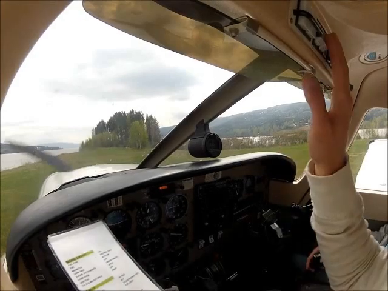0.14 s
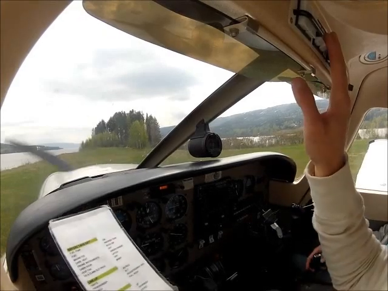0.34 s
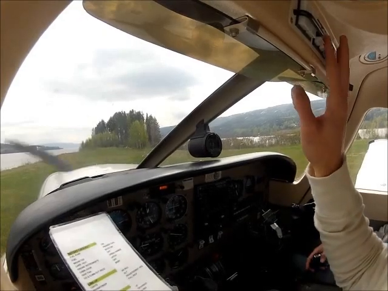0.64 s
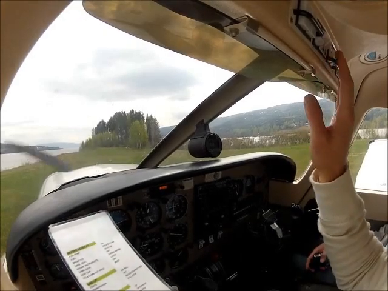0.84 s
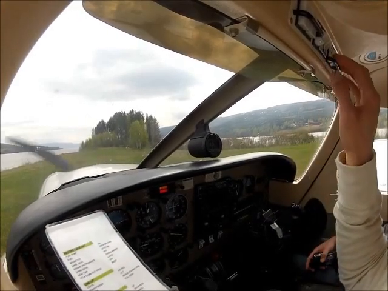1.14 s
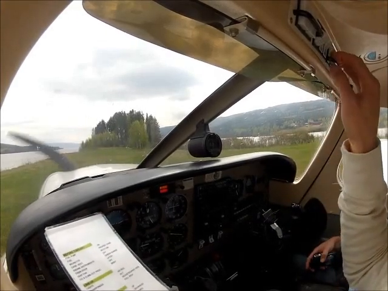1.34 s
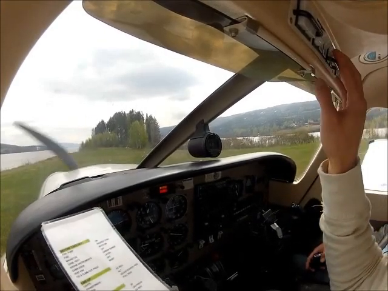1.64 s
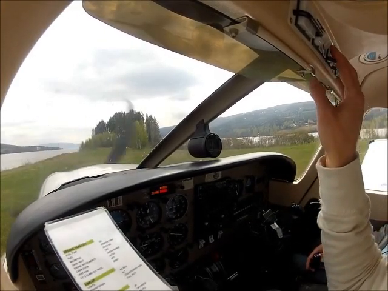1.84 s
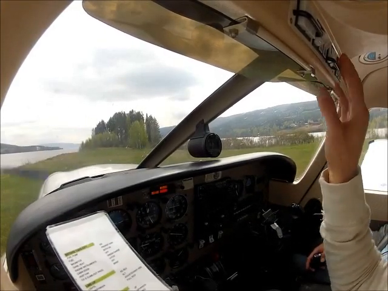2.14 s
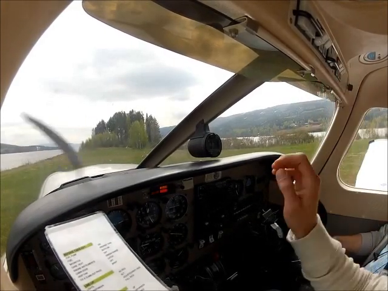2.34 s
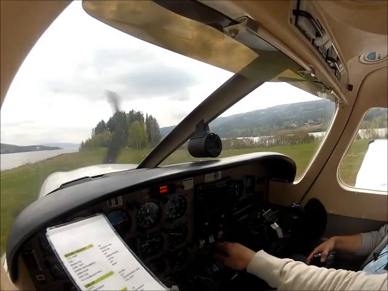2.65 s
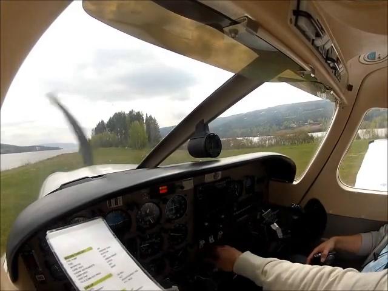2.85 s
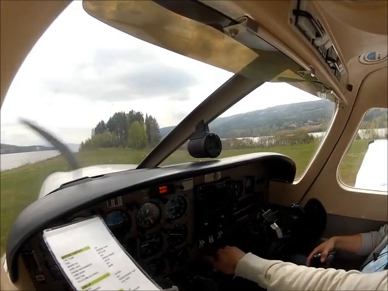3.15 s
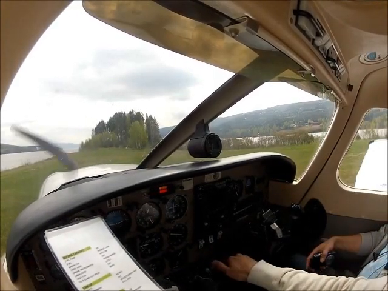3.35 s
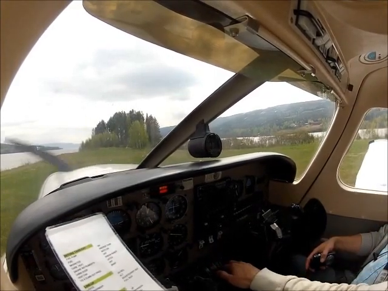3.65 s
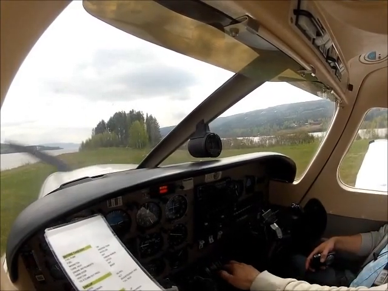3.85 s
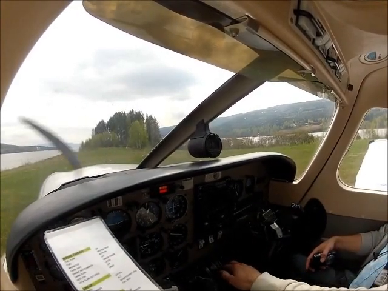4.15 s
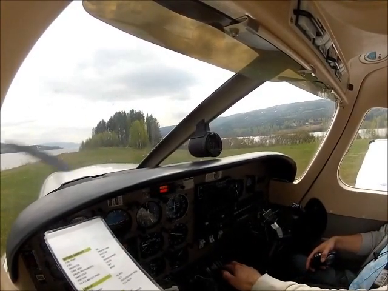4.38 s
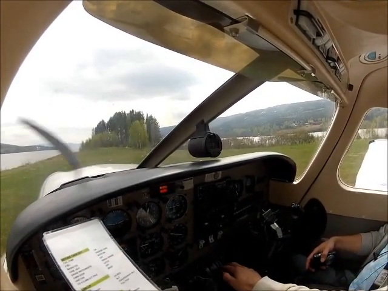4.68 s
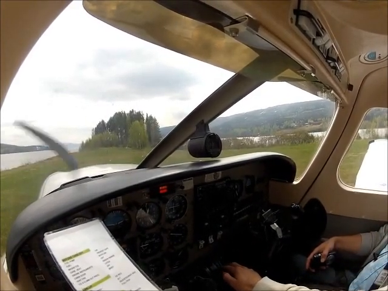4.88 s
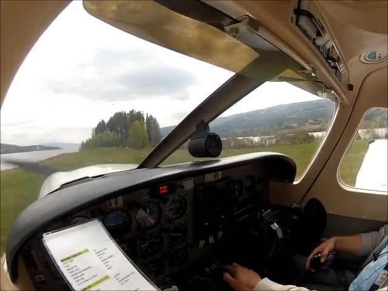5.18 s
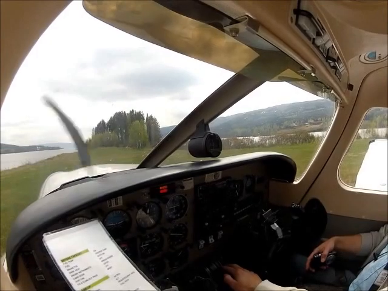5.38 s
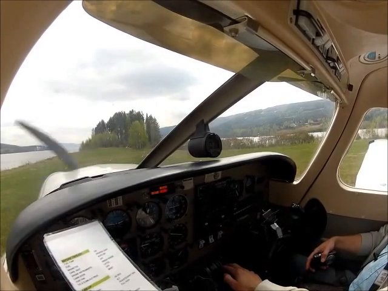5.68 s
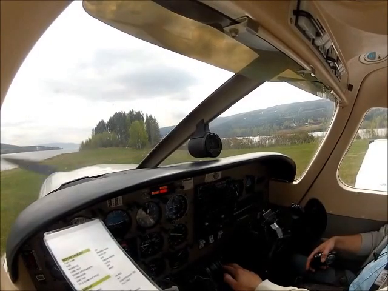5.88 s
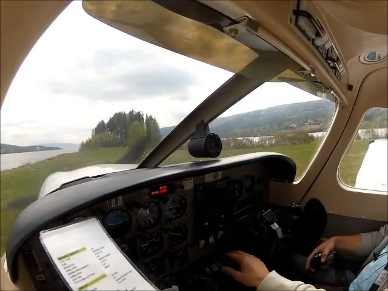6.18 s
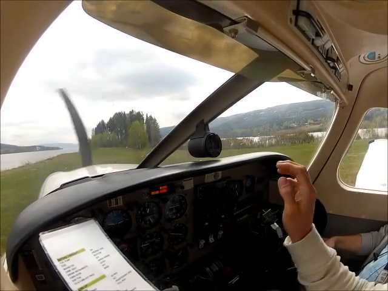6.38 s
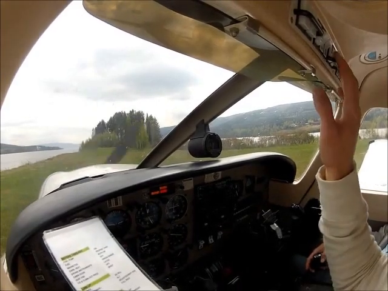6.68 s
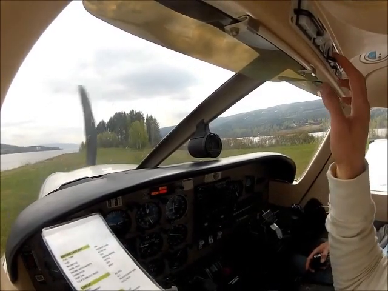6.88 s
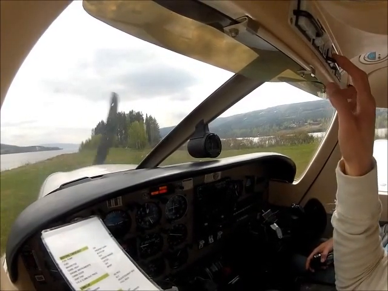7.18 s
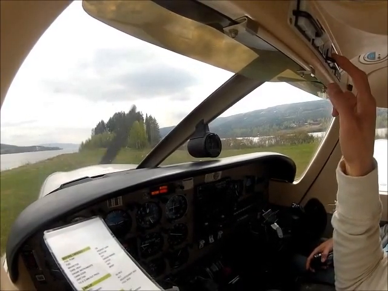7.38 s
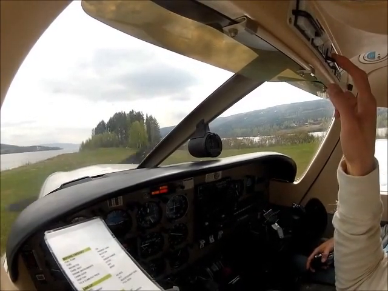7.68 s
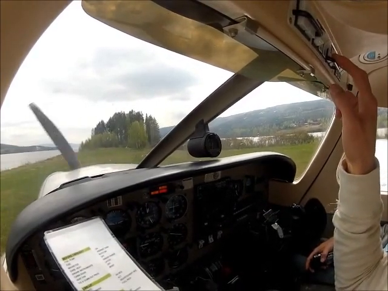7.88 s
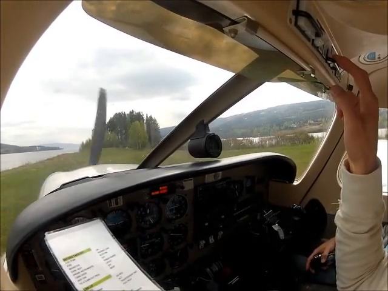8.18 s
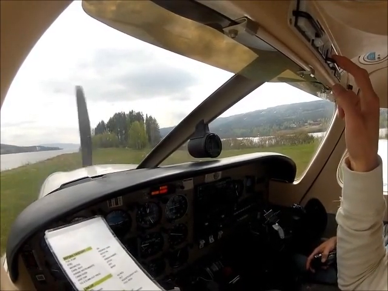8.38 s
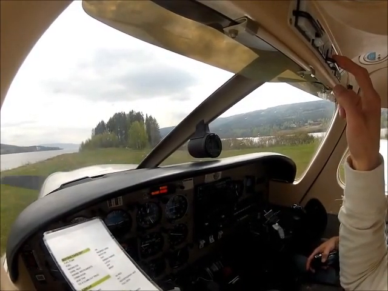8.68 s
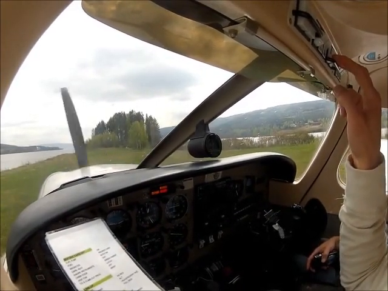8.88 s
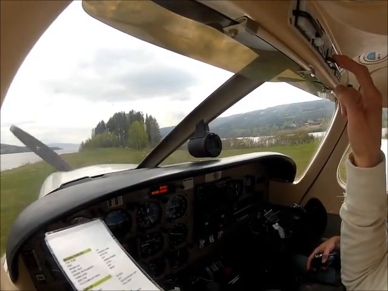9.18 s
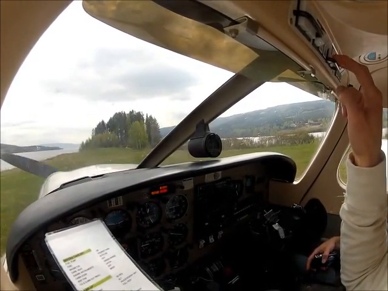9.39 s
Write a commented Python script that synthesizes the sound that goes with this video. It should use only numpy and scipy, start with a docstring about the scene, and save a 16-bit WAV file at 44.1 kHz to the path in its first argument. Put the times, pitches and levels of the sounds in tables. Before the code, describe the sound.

A close, boxy cabin sound on a coarse little camera microphone: low engine drone, rumble and airy hiss. Roof switches click sharply, ignition cuts for a moment, and the exhaust thumps violently, momentarily ducking the sound. The drone returns, with tiny metal chirps, before running down. Dull knocks and rattling ticks alternate ever slower, cowling buzzing, then stop under a faint high whine.

```python
"""In an aircraft cockpit, on a small camera's microphone, a piston engine idles: multiples of its throb and noise
swelling with each firing, under a thin gyro whine. Roof switches snap as short noise bursts; the ignition is cut for
a moment and the exhaust thumps, as decaying tones, as it catches again. Small metal parts chirp. Then the fuel is
cut and the engine runs down; once it is slow, ringing noise makes the paired clacks of the magneto couplings, a
panel slaps and the cowling buzzes, until the propeller rests. The camera samples coarsely and ducks after overload."""
import sys
import numpy as np
from scipy import signal
from scipy.fft import rfft, irfft, next_fast_len
from scipy.io import wavfile
from scipy.ndimage import uniform_filter1d, minimum_filter1d

SR = 44100
rng = np.random.default_rng(int(sys.argv[2]) if len(sys.argv) > 2 else 0)


def log_audio(samples):
    """Write samples as a 16-bit WAV file to the path given in sys.argv[1]."""
    # one column per channel
    frames = np.atleast_2d(samples).T
    # limit to full scale, then quantise
    limited = np.clip(frames, -1, 1)
    pcm = np.round(limited * 32767).astype(np.int16)
    wavfile.write(sys.argv[1], SR, pcm)


N = 420252

# gyro instruments spinning on: time_s, whine_hz, level_db
GYRO_WHINE = [(0, 778, -44.5), (3.5, 775.5, -39), (6, 778.3, -44), (7.4, 771, -42), (9.53, 752, -42)]
# faint chirps of small metal parts: start_s, peak_db, pitch_hz
CHIRPS = [(3.24, -43.5, 4000), (3.28, -43, 4010), (3.388, -45.5, 4100), (3.425, -45, 4070),
          (3.482, -39, 4020), (3.52, -43.5, 4030), (6.503, -41, 2600), (6.524, -40, 2430),
          (6.589, -41, 2970), (6.611, -39, 2830), (6.632, -43, 2650), (7.162, -43, 3200),
          (7.185, -39, 2880), (7.215, -41, 3640), (7.238, -39, 3660), (7.294, -37, 3620), (7.31, -42, 3640),
          (7.395, -49, 2960)]
# roof switches and levers: start_s, peak_db, ping_db (against the peak)
SWITCHES = [(0.7975, -20, -9), (1.398, -34, -18), (1.4177, -37, -19), (1.4617, -11.5, -18),
            (1.47, -18, 1.5), (1.9827, -13, 0.5), (3.1273, -32.5, -26), (6.31, -44, -20), (6.813, -37, -25),
            (6.9227, -46, -20), (7.025, -39.5, -22), (7.07, -47, -23), (7.362, -39, -17),
            (7.417, -37.5, -18)]
# spectrum of a switch snap: frequency_hz, density_db (per Hz, relative)
SWITCH_SPECTRUM = [(410, -12), (700, -8), (808, -11), (1170, -18), (1450, -6), (1970, -16.5), (2850, -3),
                   (3760, -9), (4190, -5.5), (6000, -24.5), (7800, -77), (13200, -120)]
# resonances of the switch ping: frequency_hz, width_hz, level_db (relative)
PING_MODES = [(4100, 350, 0), (5200, 1300, -5)]
SNAP_DECAY_S = .0055
# the slowing engine rocks on its mounts: time_s, rocking_db
ROCKING = [(7.45, -29), (7.6, -6.5), (7.9, -2.5), (8.12, -0.5), (8.33, -3.5), (8.5, -11), (9, -12),
           (9.45, -9)]
# airframe boom under the cowling buzz: frequency_hz, width_hz, level_db (against the rocking)
SWAY_MODES = [(94, 25, -18)]
COWLING_DB = -47.5   # buzz against the rocking
SWAY_FOLLOWS = 1.7   # dB of boom per dB of rocking: it swells more steeply than the buzz
# a loose panel slapping while the engine rocks: start_s, level_db (relative)
SLAPS = [(7.6374, -34), (7.7068, -31), (7.7844, -31), (8.0093, -17), (8.044, -24), (8.085, -23),
         (8.1294, -31), (8.1683, -24.5), (8.2613, -23.5)]
# unburnt fuel going off in the exhaust: start_s, peak_db, pitch_hz, t60_s
THUMPS = [(1.989, -0.5, 350, 0.23), (1.6, -8.5, 120, 0.33), (1.9898, -6, 320, 0.16), (2.0074, 9, 262, 0.06),
          (2.0104, 12, 590, 0.027)]
# first magneto coupling, dull: release_s, knock_db (relative)
CLACKS = [(7.501, -2), (7.558, -11.5), (7.625, -9), (7.695, -9), (7.768, -9.5), (7.843, -9), (7.914, -8),
          (7.995, -7), (8.074, -7), (8.159, -7.5), (8.244, -6), (8.34, -7), (8.443, -7.5), (8.551, -7.5),
          (8.664, -7.5), (8.784, -8), (8.913, -8), (9.05, -8.5), (9.2, -8), (9.374, -10.5)]
# second coupling, rattling: release_s, knock_db (relative)
RATTLES = [(7.529, -15.5), (7.591, -10.5), (7.659, -11.5), (7.73, -12), (7.803, -11), (7.877, -9),
           (7.954, -8), (8.034, -9), (8.115, -6.5), (8.201, -10), (8.295, -10.5), (8.399, -7.5),
           (8.508, -9), (8.617, -11.5), (8.737, -7.5), (8.865, -9), (9.001, -9), (9.15, -9.5), (9.314, -10),
           (9.519, -24.5)]
# contacts within one release of the first coupling: lag_s, level_db (against the knock)
CLACK_CONTACTS = [(-.0055, -16.5), (-.0028, -5), (-.0002, 3.5), (.0075, -6), (.015, -12)]
# contacts within one release of the second coupling: lag_s, level_db (against the knock)
RATTLE_CONTACTS = [(-.0022, 1), (.002, -8.5), (.006, -6.5), (.011, -8)]
# resonances of the knock through the firewall: frequency_hz, width_hz, level_db (relative)
KNOCK_MODES = [(479, 91, -1.5), (594, 53, 1.5), (691, 33, 4), (842, 67, -0.5)]
# resonances of the ticking metal: frequency_hz, width_hz, level_db (relative)
METAL_MODES = [(1116, 104, -4), (1560, 143, -2.5), (1970, 290, -1), (2340, 450, -3), (2640, 207, 6),
               (3047, 115, 1.0), (3260, 550, -8.5), (3940, 120, -6), (4190, 87, -5.5), (5180, 440, -20.5)]
# resonances of the airframe when shoved: frequency_hz, width_hz, level_db (relative)
SHOVE_MODES = [(34.6, 29, -0.5), (98, 43.5, 2.5), (210, 128, -9)]
# tick against the knock: (dB early, dB late); the clack's stays level, the rattle's steps up after CATCH_S
CLACK_TICK_DB, RATTLE_TICK_DB, CATCH_S = (-2.5, -2.5), (-3, 1), 8.23
# engine speed: time_s, throb_hz
SPEED = [(0.0, 39.6), (1.5, 40.3), (1.63, 38.3), (1.83, 33.3), (1.95, 32.6), (2.37, 36.3), (2.62, 37.9),
         (3.09, 39.3), (3.8, 39.9), (4.45, 41.1), (5.0, 39.9), (5.4, 38.6), (5.63, 33.9), (6.26, 25.6),
         (6.59, 22.0), (6.9, 19.3), (7.4, 15.7), (8.0, 12.7), (8.7, 8.6), (9.53, 5.0)]
# combustion against steady idle, the throb lagging behind: time_s, firing_db, throb_db
BURN = [(0, -0.5, 1.5), (1.45, 1, 0.5), (1.65, -4.5, 2.5), (1.85, -22, -30), (1.98, -25, -33),
        (2.25, -3.5, -19), (2.6, -3.5, -4), (3.0, -2, -4.5), (3.4, -0.5, 1), (4.5, 1.5, -1.5), (5.3, -2, 1),
        (5.5, -7, -3), (5.7, -21, -34), (6.2, -50, -50)]
# multiples of the throb: multiple, fired_db (from firing), pumped_db (from pistons pumping air)
ORDERS = [(1., -11, -23.5), (2., -14.5, -19.5), (3., -19.5, -32), (4., -26.5, -32.5), (5., -34.5, -38.5),
          (6., -38.5, -40), (7., -42.5, -44.5), (8., -40, -46), (10., -49, -41), (.5, -26, -42),
          (1.5, -28, -47.5), (2.5, -25.5, -41), (3.5, -39, -47), (4.5, -41, -44), (.75, -49, -50),
          (1.25, -38, -49), (1.75, -39, -48), (2.25, -35.5, -47)]
# how the cabin answers a low tone: frequency_hz, gain_db
CABIN_RESPONSE = [(12, -9), (19, -8), (24, -4), (27, 4.5), (33, -3), (40, -1.5), (50, 2), (57, 6.5),
                  (66, -4), (80, 0.5), (98, 3), (106, 3.5), (116, -7.5), (122, 2), (135, 1.5), (160, 0.5),
                  (176, -0.5), (188, 8.5), (200, 0)]
# strength of the four firings in one lope: strength_db
CYLINDERS_DB = [-2, -11, -4, -6.5]
# airframe noises, in rows rumble, drumming, hiss: fired_db (from firing), turning_db (from turning at idle),
# loss_db (per halving of speed), rocked_db (from rocking)
AIRFRAME = [(-21.5, -24.5, 1.5, -19.5), (-23, -25, 5, -22.5), (-44, -46, 3, -48)]
# spectrum of the lowest airframe noise: frequency_hz, density_db (per Hz, relative)
RUMBLE_SPECTRUM = [(15, -20), (25, -8), (45, -1.5), (70, -8), (100, 1.5), (140, -6), (190, -4),
                   (230, -10.5), (330, -25.5), (500, -60)]
# spectrum of the middle airframe noise: frequency_hz, density_db (per Hz, relative)
DRUMMING_SPECTRUM = [(150, -30), (250, -3), (388, -2), (491, -3.5), (553, -9), (674, -7.5), (731, -10.5),
                     (797, -7), (948, -22), (1100, -25.5), (1430, -57), (2420, -120)]
# spectrum of the highest airframe noise: frequency_hz, density_db (per Hz, relative)
HISS_SPECTRUM = [(530, -36), (900, -14), (1170, -6), (1270, -13.5), (1680, -10.5), (1770, -16), (2910, -12),
                 (3330, -15.5), (4070, -18), (4300, -20.5), (6000, -33), (7800, -74), (13200, -120)]
IDLE_HZ = 40   # throb rate at idle
GEAR_MULTIPLE, GEAR_DB = 20.3, -36.5   # accessory gear whine: multiple of the throb, dB at idle
STOP_S, STOP_DB_S = 9.334, 65   # the propeller comes to rest: time, then fall in dB per second
DUCK_FROM_DB, DUCK_HOLD_S, DUCK_RELEASE_DB_S, DUCK_ATTACK_S = 1.5, 0.13, 96, 0.0022
HOLD_HZ, CUTOFF_HZ = 12000, 15950   # the camera's coarse sampling rate and its top cut


def from_db(db):
    """Gain of a level in dB."""
    return 10 ** (np.asarray(db) / 20)


def rms_one(x):
    """Scaled to rms 1."""
    return x / np.sqrt(np.mean(x ** 2) + 1e-20)


def in_time(curve):
    """Columns of a curve table, interpolated to one value a sample."""
    time_s, *columns = np.transpose(curve)
    return [np.interp(np.arange(N) / SR, time_s, column) for column in columns]


def drift(rate_hz):
    """Slow random wander of rms 1: noise through two equal low-pass poles, run at every 40th sample."""
    r = np.exp(-2 * np.pi * rate_hz * 40 / SR)
    noise = rng.standard_normal(N // 40 + 2002)
    slow = signal.lfilter([1], [1, -2 * r, r * r], noise)[2000:]   # settled part only
    return np.interp(np.arange(N) / 40, np.arange(len(slow)), rms_one(slow))


def coloured(spectrum):
    """Noise of rms 1 with the given spectrum, interpolated over log frequency."""
    hz, density_db = np.transpose(spectrum)
    size = next_fast_len(N)
    log_hz = np.log(np.arange(size // 2 + 1) * SR / size + 1)
    gain = from_db(np.interp(log_hz, np.log(hz), density_db, left=-99, right=-99))
    return rms_one(irfft(rfft(rng.standard_normal(size)) * gain, size)[:N])


def resonate(x, modes):
    """Parallel two-pole resonances, signs alternating."""
    out = 0
    for k, (hz, width_hz, level_db) in enumerate(modes):
        r = np.exp(-np.pi * width_hz / SR)
        poles = [1, -2 * r * np.cos(2 * np.pi * hz / SR), r * r]
        zeros = np.array([1, 0, -1]) * (1 - r * r) / 2
        out = out + (-1) ** k * from_db(level_db) * signal.lfilter(zeros, poles, x)
    return out


def bursts(starts_s, levels_db, decays_s, rise_s):
    """Envelope of short rattles: a quick rise, then an exponential fall."""
    out, t = np.zeros(N + 4000) + 1e-9, np.arange(4000) / SR
    for start_s, level_db, decay_s in zip(starts_s, levels_db, decays_s):
        shape = (1 - np.exp(-t / rise_s)) * np.exp(-t / max(decay_s, .001))
        out[round(start_s * SR):][:4000] += from_db(level_db) * shape
    return out[:N]


def metal(envelope):
    """Noise under the envelope, ringing in the metal and dulled by the firewall."""
    ringing = resonate(envelope * rng.standard_normal(N), METAL_MODES)
    return signal.sosfilt(signal.butter(3, 4600, fs=SR, output="sos"), ringing)


def rocking_db():
    """Level of the engine's rocking on its mounts, silent before it starts."""
    return np.where(np.arange(N) < ROCKING[0][0] * SR, -99, in_time(ROCKING)[0])


def gyros():
    """Spinning instruments: a thin sine whine, slightly unsteady in pitch and level."""
    whine_hz, level_db = in_time(GYRO_WHINE)
    cycles = np.cumsum(whine_hz + 1.53 * drift(3.19)) / SR
    return np.sqrt(2) * from_db(level_db + 1.3 * drift(12.0)) * np.sin(2 * np.pi * cycles)


def chirps():
    """Small metal parts: narrow noise in a short, soft-edged swell."""
    out, t = np.zeros(N), np.arange(1000) / SR
    swell = t / 0.0045 * np.exp(1 - t / 0.0045)   # reaches 1 after 4.5 ms
    for start_s, peak_db, hz in CHIRPS:
        mode = [(hz, 250, 0)]
        rub = rms_one(resonate(resonate(rng.standard_normal(1000), mode), mode))
        out[round(start_s * SR):][:1000] += from_db(peak_db - 6) * rub * swell   # noise peaks above its rms
    return out


def switches():
    """Roof switches: bright noise snaps with a short ring in the cabin, each with a resonant ping."""
    start_s, peak_db, ping_db = np.transpose(SWITCHES)
    decay_s = 0 * start_s + SNAP_DECAY_S
    snap = bursts(start_s - .001, peak_db, decay_s, rise_s=0.0012)
    cabin_ring = bursts(start_s, peak_db - 16, 3.4 * decay_s, rise_s=0.0022)
    ping = rms_one(resonate(rng.standard_normal(N), PING_MODES))
    ping_envelope = bursts(start_s, peak_db + ping_db, decay_s, rise_s=0.00023)
    return (snap + cabin_ring) * coloured(SWITCH_SPECTRUM) + ping * ping_envelope


def cowling():
    """The rocking engine shakes the cowling: dense uneven grains ring in the metal, over an airframe boom."""
    uneven = from_db(3.2 * np.minimum(rng.exponential(1, N), 4))
    grains = (rng.random(N) < 1500 / SR) * uneven   # about 1500 a second
    buzz = from_db(COWLING_DB + 4.4 * drift(25.0)) * rms_one(metal(grains))
    sway = rms_one(resonate(resonate(rng.standard_normal(N), SWAY_MODES), SWAY_MODES))
    boom = from_db(SWAY_MODES[0][2] + (SWAY_FOLLOWS - 1) * rocking_db()) * sway
    return from_db(rocking_db()) * (buzz + boom)


def panel_slaps():
    """A loose panel slaps while the engine rocks: noise bursts ringing in metal."""
    start_s, level_db = np.transpose(SLAPS)
    return metal(bursts(start_s - .001, level_db + 14.5, 0 * start_s + 0.0057, rise_s=0.0012))


def exhaust():
    """Unburnt fuel goes off: dull blows ring in the pipe as decaying sines."""
    out, t = np.zeros(N), np.arange(N) / SR
    for start_s, peak_db, hz, t60_s in THUMPS:
        age_s = np.maximum(t - start_s, 0)
        out += from_db(peak_db - 60 * age_s / t60_s) * np.sin(2 * np.pi * hz * age_s)
    return out


def coupling(releases, contacts, ticks_db, tick_decay_s):
    """Every spring release repeats the same contacts: a knock through the firewall, a metal tick, a shove."""
    release_s, knock_db = np.transpose(releases)
    early_db, late_db = ticks_db
    tick_db = knock_db + np.where(release_s > CATCH_S, late_db, early_db)
    blows, chance = np.zeros(N + SR), rng.standard_normal((len(release_s), len(contacts)))
    for k, (lag_s, level_db) in enumerate(contacts):
        at = np.round((release_s + lag_s) * SR).astype(int)
        blows[at] += from_db(knock_db + level_db + 1.3 * chance[:, k])
    firewall = signal.butter(4, [410, 900], "band", fs=SR, output="sos")
    knock = from_db(35.5) * signal.sosfilt(firewall, resonate(blows[:N] + 1e-18, KNOCK_MODES))
    tick = bursts(release_s - .002, tick_db, 0 * release_s + tick_decay_s, rise_s=0.0014)
    tail = bursts(release_s, tick_db - 27.0, 0 * release_s + 0.015, rise_s=0.0024)   # the cabin rings on after each tick
    shove = bursts(release_s, knock_db + 18.5, 0 * release_s + 0.018, rise_s=0.0027)
    return knock + metal(tick + tail) + resonate(shove * rng.standard_normal(N), SHOVE_MODES)


def magnetos():
    """The spring couplings of the two magnetos, a dull clack and a rattle in turn."""
    return (coupling(CLACKS, CLACK_CONTACTS, CLACK_TICK_DB, 0.0043)
            + coupling(RATTLES, RATTLE_CONTACTS, RATTLE_TICK_DB, 0.0084))


def gear_whine(throbs):
    """Accessory gears: a tone at a fixed multiple of the throb, following the throb's level."""
    throb_db = in_time(BURN)[1]
    return from_db(throb_db + GEAR_DB + 2.1 * drift(6.9)) * np.cos(2 * np.pi * GEAR_MULTIPLE * throbs)


def hum(turn):
    """Firing and air pumping drive cosines at multiples of the throb, coloured by the cabin."""
    throb_hz, t = in_time(SPEED)[0], np.arange(N) / SR
    burning, throbbing = [from_db(db) for db in in_time(BURN)]
    cabin_hz, cabin_db = np.transpose(CABIN_RESPONSE)
    out = 0
    for k, fired_db, pumped_db in ORDERS:
        push = from_db(fired_db) * (throbbing if k == 1 else burning) + from_db(pumped_db)
        # no two cycles burn alike: the higher multiples waver more
        gain_db = np.interp(k * throb_hz, cabin_hz, cabin_db) + 0.24 * k * drift(2.7)
        tone = np.cos(2 * np.pi * k * turn + 0.9 * k * k)
        out = out + np.sqrt(2) * push * from_db(gain_db) * tone
    return out * np.clip((8.7 - t) / 0.4, 0, 1)   # too slow to be heard as a tone


def firing_pulse(turn):
    """Two firings a throb, uneven between cylinders and by chance, each falling until the next."""
    firing = np.abs(2 * turn).astype(int)
    strength_db = np.array(CYLINDERS_DB)[firing % 4] + 1.7 * rng.standard_normal(1000)[firing]
    return uniform_filter1d(from_db(strength_db) * np.exp(-1.5 * (2 * turn % 1)), size=60)


def airframe(turn):
    """Firing, turning and rocking add in power to drive rumble, drumming and hiss in the airframe."""
    t, firing_db, rocks_db = np.arange(N) / SR, in_time(BURN)[0], rocking_db()
    halvings = np.log2(IDLE_HZ / in_time(SPEED)[0])
    rest_gain = from_db(-STOP_DB_S * np.maximum(t - STOP_S, 0))
    levels = []
    for fired_db, turning_db, loss_db, rocked_db in AIRFRAME:
        power = from_db(2 * (fired_db + firing_db))
        power = power + from_db(2 * (turning_db - loss_db * halvings))
        power = power + from_db(2 * (rocked_db + rocks_db))
        levels.append(rest_gain * np.sqrt(power))
    pulse = firing_pulse(turn)
    rumble = from_db(0.64 * drift(11.0)) * coloured(RUMBLE_SPECTRUM)
    drumming = rms_one(coloured(DRUMMING_SPECTRUM) * (1.07 + pulse) * from_db(0.95 * drift(41.0)))
    hiss = rms_one(coloured(HISS_SPECTRUM) * (1.24 + pulse))
    return levels[0] * rumble + levels[1] * drumming + levels[2] * hiss


def engine():
    """The crank's turning, counted in throbs, times the hum, the gear whine and the airframe noise."""
    throbs = np.cumsum(in_time(SPEED)[0]) / SR
    turn = throbs + 0.0059 * drift(5.3)   # the crank turns a little unevenly
    return hum(turn) + gear_whine(throbs) + airframe(turn)


def scene():
    """Everything in the cockpit, at the one microphone."""
    background = gyros() + chirps() + switches() + cowling() + panel_slaps()
    return (background + exhaust() + magnetos() + engine())[None]


def duck(x):
    """Overload turns the level down by its excess; the cut holds, then releases steadily in dB."""
    over_db = np.maximum(20 * np.log10(np.abs(x) + 1e-9) - DUCK_FROM_DB, 0)
    half = round(DUCK_HOLD_S * SR / 2)
    held_db = np.roll(-minimum_filter1d(-over_db, size=2 * half + 1), half)   # maximum over the past hold time
    fall_db = DUCK_RELEASE_DB_S * np.arange(N) / SR
    released_db = np.maximum.accumulate(held_db + fall_db) - fall_db
    r = np.exp(-1 / (DUCK_ATTACK_S * SR))
    cut_db = signal.lfilter([1], [1, -2 * r, r * r], released_db) * (1 - r) ** 2
    return x * from_db(-cut_db)


def record(dry):
    """The camera: ducking after overload, hard clipping, stair-step playback of coarse samples, top cut."""
    x = np.clip(duck(dry[0]), -1, 1)
    x = signal.sosfilt(signal.ellip(10, .5, 60, HOLD_HZ / 2, fs=SR, output="sos"), x)
    # holding each sample mirrors the sound about the sampling rate, under a sinc
    mirrored = x * (1 + 2 * np.cos(2 * np.pi * HOLD_HZ * np.arange(N) / SR))
    size = next_fast_len(N)
    hold_gain = np.sinc(np.arange(size // 2 + 1) * SR / size / HOLD_HZ)
    stepped = irfft(rfft(mirrored, size) * hold_gain, size)[:N]
    return signal.sosfilt(signal.ellip(14, .5, 90, CUTOFF_HZ, fs=SR, output="sos"), stepped)[None]


dry = scene()
out = record(dry)
log_audio(out)
```